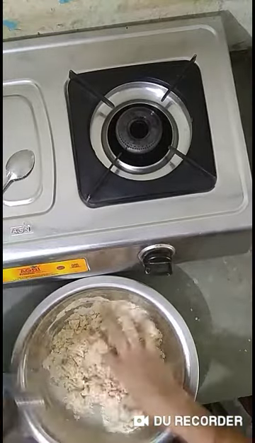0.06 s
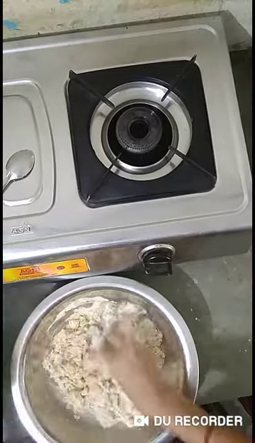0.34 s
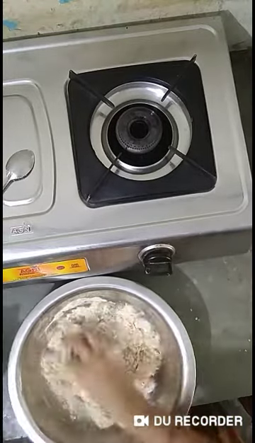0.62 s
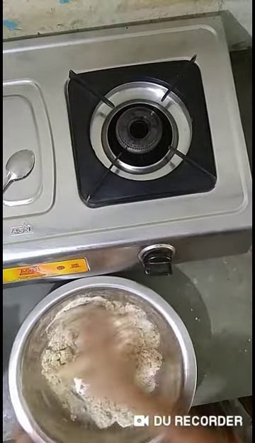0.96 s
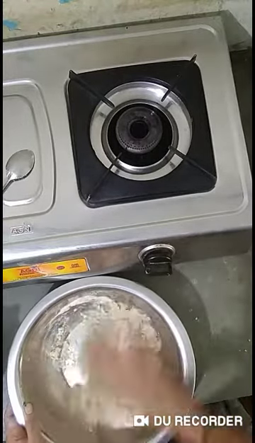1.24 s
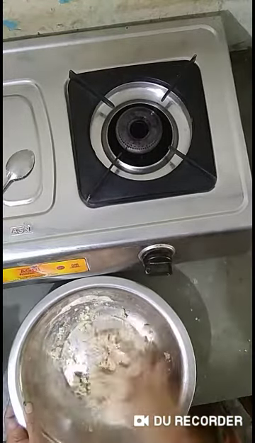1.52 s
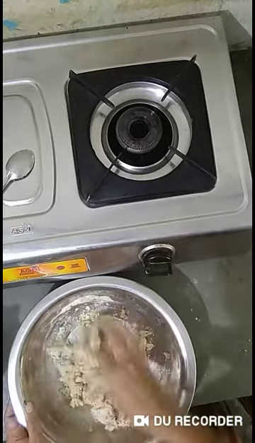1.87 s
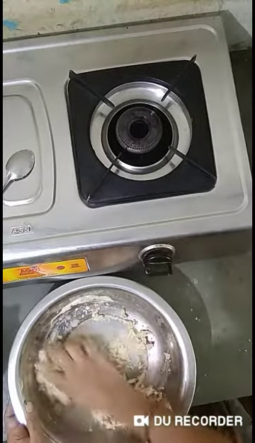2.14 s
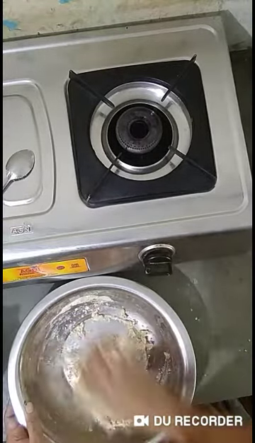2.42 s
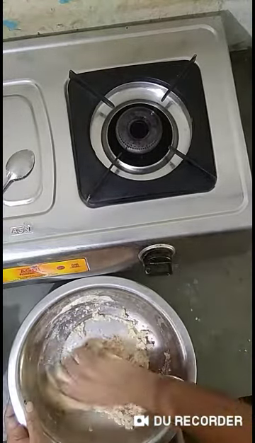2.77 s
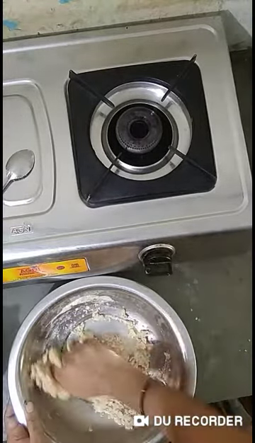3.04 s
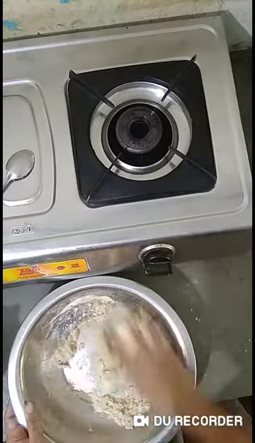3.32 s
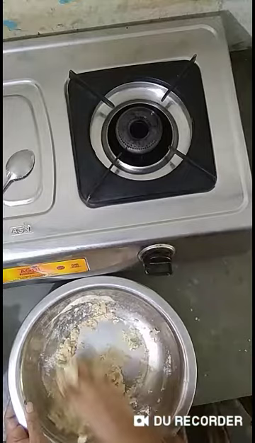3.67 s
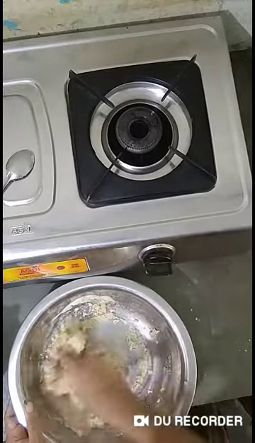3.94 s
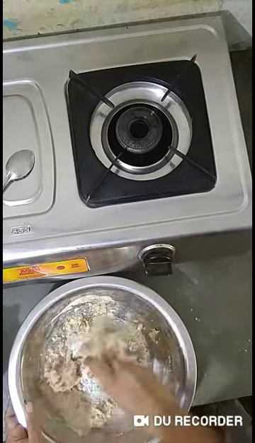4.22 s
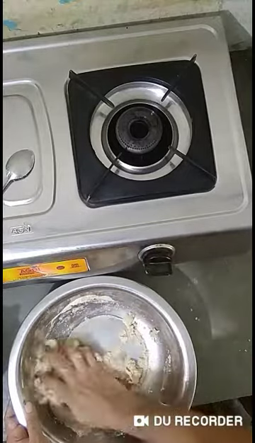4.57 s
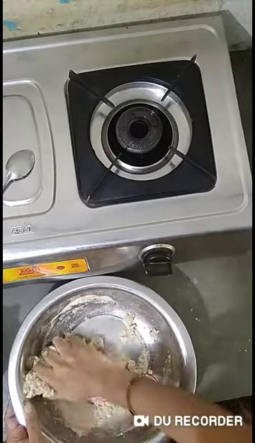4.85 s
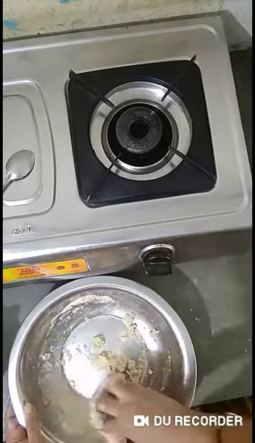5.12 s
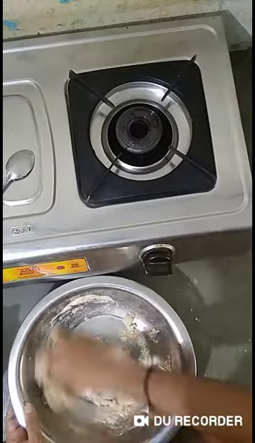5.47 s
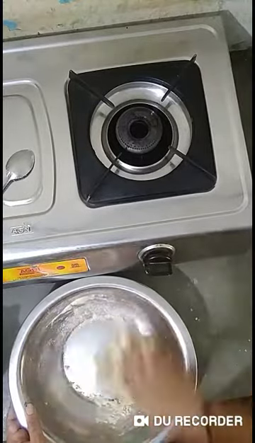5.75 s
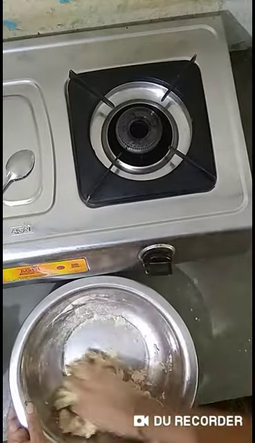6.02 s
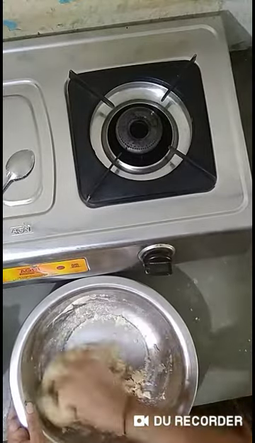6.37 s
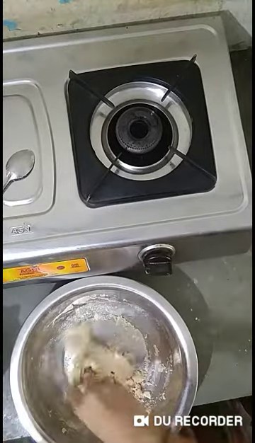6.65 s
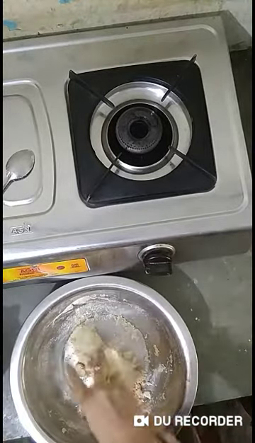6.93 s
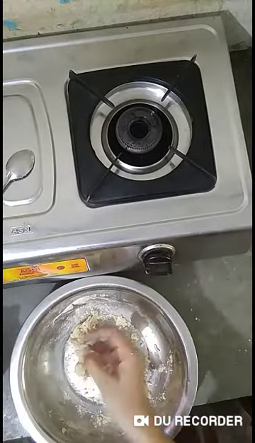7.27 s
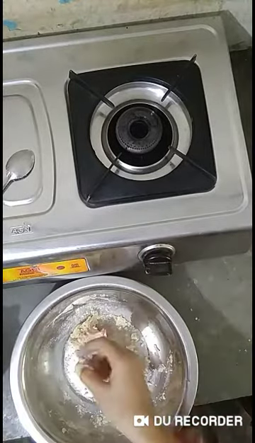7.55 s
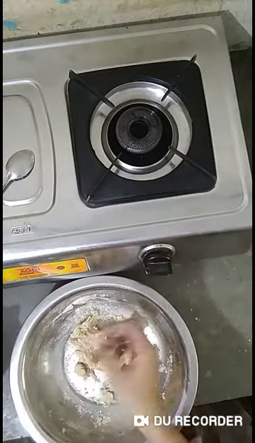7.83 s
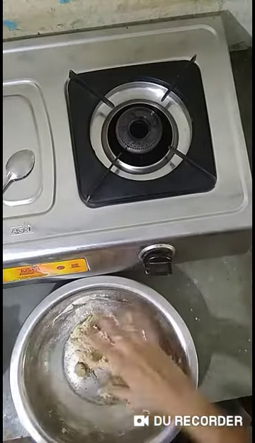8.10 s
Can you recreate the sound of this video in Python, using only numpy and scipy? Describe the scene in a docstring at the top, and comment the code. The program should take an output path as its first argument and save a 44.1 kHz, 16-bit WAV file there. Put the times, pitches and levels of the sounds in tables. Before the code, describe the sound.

Dry rubbing strokes of dough mixed by hand, with irregular thuds and brief rings of a steel bowl rocking on a kitchen counter.

```python
"""Dough in a steel bowl

Close to a stone counter in a small, hard kitchen; a stereo pair, the left microphone nearer the bowl.
A hand stirs and presses crumbly dough, and flour hisses along the steel with every stroke. A steel cup
is set down early on, then the bowl rocks, thuds and clanks on the stone and the room rings briefly.
Birds call faintly, far outside."""
import sys
import numpy as np
from scipy import signal
from scipy.fft import rfft, irfft, next_fast_len
from scipy.io import wavfile
from scipy.ndimage import uniform_filter1d

SR = 44100
rng = np.random.default_rng(int(sys.argv[2]) if len(sys.argv) > 2 else 0)


def dump_mix(stems):
    """Bounce the given channels to the path in sys.argv[1] as a 16-bit WAV at rate SR."""
    frames = np.atleast_2d(stems).T  # one column per channel
    limited = np.clip(frames, -1, 1)  # hard clip at full scale
    pcm = np.round(limited * 32767).astype(np.int16)
    wavfile.write(sys.argv[1], SR, pcm)


N = 369849

# The quiet kitchen. Each row: frequency in Hz, relative level in dB.
ROOM_TONE_SPECTRUM = [(20, -2), (45, -18), (67, 7), (90, -4.5), (240, -13), (430, -27.5), (750, -5),
                      (1100, -22.5), (1600, -36), (5000, -35), (16000, -36.5)]
# The hand's strokes. Each row: fastest moment, time speeding up and time slowing down in seconds,
# then relative level, pressure on the crumbs and grip on the bare wall in dB.
HAND_STROKES = [(0.13, 0.11, 0.2, -43, -3, 1), (0.23, 0.085, 0.081, -49, 8.5, 11),
                (0.56, 0.14, 0.13, -41.5, 5, -1.5), (0.78, 0.22, 0.42, -59, 3, 8),
                (1.09, 0.18, .22, -36.5, -4, -2.5), (1.52, 0.24, 0.16, -40.5, -1.5, -5),
                (2.1, 0.17, 0.19, -46.5, 0, -1), (2.36, 0.049, 0.042, -57, -10, -11),
                (2.61, 0.27, 0.17, -50, 3, 3.5), (2.87, 0.29, 0.23, -56.5, 3, 0),
                (3.17, 0.21, 0.3, -52.5, 4.5, 3), (3.435, 0.093, 0.09, -39, 1, -3.5),
                (3.7, 0.33, 0.15, -52.5, 5, 4.5), (3.9, 0.11, 0.21, -56, 1.5, 6.5),
                (4.13, 0.35, 0.17, -59, 0.5, 8), (4.48, 0.11, 0.19, -44.5, 2.5, 4),
                (4.89, 0.073, 0.19, -52.5, -5, -0.5), (5.04, 0.072, 0.12, -49.5, -5.5, -7),
                (5.36, .12, 0.18, -45, -1.5, -3.5), (5.58, 0.15, 0.059, -45.5, -3.5, -19),
                (5.85, 0.75, 0.49, -49.5, 2.5, 3), (6.45, .19, 0.3, -51.5, -1, 3),
                (6.8, 0.048, 0.12, -71, 12.5, 21.5), (7.009, .05, 0.092, -65.5, -4, 5.5),
                (7.245, 0.39, 0.081, -57, -26, -24.5), (7.365, 0.044, 0.096, -61, -12, -8),
                (7.645, 0.089, 0.12, -64.5, -20, -19.5), (7.914, 0.058, 0.11, -63, -26, 0),
                (8.108, .04, 0.088, -74, -1, 6.5), (8.215, 0.043, 0.38, -50.5, 0.5, 6.5)]
# Flour, then crumbs, sliding on steel. Each row: frequency in Hz, relative level in dB.
FLOUR_SPECTRUM = [(1500, -42), (3200, -25), (3900, -11.5), (5600, -7), (6600, -4), (8200, -4), (10400, 1),
                  (12500, -5), (15500, -9.5), (17000, -19.5)]
CRUMB_SPECTRUM = [(400, -28.5), (900, -22.5), (1200, -3.5), (1900, -6), (2500, -2), (3200, -1.5),
                  (3800, -1), (5000, -14)]
# The bowl's wall under the hand. Each row: resonance in Hz, width in Hz, relative level in dB.
WALL_RESONANCES = [(225, 19, -3.5), (293.4, 28, 5), (437.2, 100, 1.5), (613, 70, -1.5), (763, 40, 3),
                   (865, 18, 9), (1000, 150, -11.5), (1122, 40, 0.5)]
# Light ticks of steel, from a nail, a bangle or the landing bowl. Each row: start in seconds,
# the tick's lowest frequency in Hz, relative levels of clang and tick in dB.
STEEL_TOUCHES = [(0.043, 5530, -90, -51), (1.73, 5850, -61.5, -57.5), (1.816, 8800, -93, -49),
                 (2, 5670, -68, -49), (3.093, 6000, -63, -51.5), (3.224, 3450, -59, -53),
                 (4.333, 3460, -83, -75), (4.662, 4030, -48.5, -62), (6.278, 3966, -73, -74),
                 (6.752, 7000, -76, -61), (6.97, 6070, -76, -75), (7.346, 6400, -90, -69),
                 (8.092, 6000, -81, -83)]
# How a blow dies away in five bands: thump, boom, body, clang, tick. Each row: low and high edge in Hz,
# clatter t60 in seconds, room tail level in dB, room t60 in seconds, modes over clatter in dB.
BLOW_BANDS = [(35, 160, .2, 0.5, 0.81, 2), (160, 350, .11, -9, 0.71, 9.5), (378, 950, .1, -6, 0.44, 5),
              (1010, 3600, .13, 10, .33, -5), (3660, 17500, .11, 2, .31, -9)]
# The cup lands, then settles. Each row: start in seconds, relative levels of the five bands in dB.
CUP_LANDINGS = [(0.437, -37.5, -39, -20.5, -37, -32.5), (0.523, -46.5, -41.5, -27.5, -39, -48.5)]
# The ring of the cup and bowl, with the counter's low hum. Each row: frequency in Hz,
# relative level in dB, t60 in seconds.
CUP_MODES = [(107, 0, .6), (134, -2, .5), (208, 0, .4), (410, -14, .35), (478, -3, .16), (530, -3, .18),
             (595, -1, .22), (621, 2.5, .32), (738, -15, .33), (958, -10, .14), (1167, -2, .26),
             (1555, -9, .33), (1792, 1, .4), (1835, -8, .3), (2272, -4, .4), (2713, -2, .36),
             (3182, -8, .38), (4021, -5, .22), (4330, -6, .19), (5518, 1, .21), (5590, -3, .16),
             (7200, -4, .17), (8970, 0, .13), (10900, -3, .12)]
BOWL_AND_COUNTER_MODES = [(65.5, -1.5, 1), (226.5, 2, 0.59), (242, 3.5, 0.26), (300.3, 4, 0.33),
                          (382, -22.5, 0.41), (420.5, -0.5, 0.43), (464.7, 5, 0.14), (535, 3.5, 0.25),
                          (626, 3.5, 0.31), (745, 3.5, 0.27), (875, 5.5, 0.23), (1020, 0, 0.28),
                          (1156, -4, 0.081), (1129, -9.5, 0.49), (1207, -4.5, 0.076), (1390, -9.5, 0.16),
                          (1720, -6.5, 0.22), (1980, -10.5, 0.32), (2330, -8, 0.2), (3590, -16, 0.5),
                          (4460, -9.5, 0.19), (4470, -9, 0.31), (5070, -13, 0.18), (5324, -9.5, 0.14),
                          (5800, -9.5, 0.067), (6977, -34, .16), (8650, 0, 0.27), (9200, -6, 0.48),
                          (9500, -1, 0.24), (11510, -3, 0.21)]
# Cup and bowl clatter on the stone. Each row: frequency in Hz, relative level in dB.
CUP_CLATTER = [(50, -3.5), (300, -2), (560, 9.5), (800, -10), (1150, -5), (2000, -19), (3200, -21),
               (6000, -12), (10000, -7), (15500, -12)]
BOWL_CLATTER = [(50, 2.5), (140, -4), (220, -3), (420, 4.5), (600, 2), (950, -2.5), (1400, -4),
                (2200, -11.5), (3000, -19.5), (4500, -10.5), (7000, -6.5), (10000, -5.5), (15500, -13)]
# The bowl rocks onto the counter. Each row: start in seconds, strength in dB, hardness (treble over
# strength) in dB, flatness from 0 (on its edge) to 1 (whole base), favoured wall mode in Hz.
BOWL_LANDINGS = [(0.739, -47.5, -12.5, 0, 414), (0.914, -50.5, -13, 0.28, 422),
                 (0.963, -40, -4.5, 0.41, 400), (1.217, -27, -6.5, 0.25, 630),
                 (1.672, -52.5, -8.5, 0.82, 406), (2.001, -40.5, -10.5, 0.96, 440),
                 (2.092, -43.5, 4, 0.4, 624), (2.296, -52, -26.5, 0.4, 885), (2.471, -38, -27, 0.32, 425),
                 (2.566, -49.5, -9, 0.81, 422), (2.616, -30, -15, 0.55, 435),
                 (3.035, -55.5, -36, 0.65, 879), (3.62, -35.5, -9, 0.81, 404),
                 (4.198, -56.5, -8.5, 0.77, 730), (4.357, -46, -2.5, 0, 785), (4.486, -36, -6, 0.4, 460),
                 (4.516, -31, 1.5, 0, 430), (4.594, -40, -4.5, 0.62, 879), (4.665, -41.5, -7.5, 0.47, 475),
                 (4.9, -37, -29, 0.48, 474), (5.523, -43.5, -10, 0.37, 427), (5.875, -40, -9, 0.26, 930),
                 (5.971, -31.5, -2, 0.39, 360), (6.381, -45.5, -29, 0.33, 444),
                 (6.472, -42, -15.5, 0.39, 466), (6.769, -50, -7.5, 0.4, 880), (7.929, -60.5, -36, 1, 622),
                 (8.214, -33.5, -10.5, 0.64, 427)]
# The bowl's bare edge lands hard. Each row: start in seconds, pitch in Hz, relative level in dB.
EDGE_CLINKS = [(0.962, 6600, -44), (1.214, 1910, -51), (2.091, 5450, -41.5), (4.514, 2086, -41),
               (4.518, 4273, -34.5), (4.516, 5360, -36), (4.515, 8380, -35.5), (5.971, 4450, -33.5),
               (5.971, 5050, -45.5), (5.969, 5340, -46.5)]
# Birds outside. Each row: start and length in seconds, first, middle and last pitch in Hz,
# relative level in dB.
FAR_CALLS = [(2.842, 0.26, 1610, 1802, 1740, -56.5), (4.739, 0.26, 2150, 1920, 1865, -62.5),
             (7.194, 0.188, 773, 739, 744, -58), (7.26, 0.21, 1534, 1472, 1485, -65.5),
             (7.496, 0.094, 3600, 3520, 3780, -74.5), (7.93, 0.13, 3510, 3430, 3510, -75.5)]
# How alike the two microphones sound. Each row: frequency in Hz, correlation.
MIC_CORRELATION = [(60, .9), (150, .94), (280, .85), (580, .78), (900, .15), (1400, 0), (16000, 0)]
# Their balance. Each row: frequency in Hz, left over right in dB.
MIC_BALANCE = [(60, .5), (125, 1.7), (250, 3.2), (2000, 3.8), (8000, 2.8), (12500, -1)]

LEAD_S = .008  # the counter carries the thud before the steel edge lands


def amp(db):
    return 10 ** (np.asarray(db) / 20)


def unit_rms(x):
    return x / np.sqrt(np.mean(x ** 2) + 1e-20)


def curve_at(points, hz):
    """Read a table along a log-frequency axis."""
    f, value = np.transpose(points)
    return np.interp(np.log(hz + 1), np.log(f + 1), value)


def add(mix, start_s, sound):
    part = mix[:, max(round(start_s * SR), 0):][:, :sound.shape[1]]
    part += sound[:, :part.shape[1]]


def decay(t, t60):
    """Amplitude that falls 60 dB in t60 seconds."""
    return np.exp(-np.log(1000) * t / t60)


def band(x, low_hz, high_hz):
    return signal.sosfilt(signal.butter(4, [low_hz, high_hz], "band", fs=SR, output="sos"), x)


def mic_pair(x, spectrum=None):
    """Two unrelated signals become a microphone pair, alike in the bass, with an optional colour."""
    size = next_fast_len(x.shape[1])
    bins, hz = rfft(x, size), np.fft.rfftfreq(size, 1 / SR)
    alike = curve_at(MIC_CORRELATION, hz)
    bins[1] = alike * bins[0] + np.sqrt(1 - alike ** 2) * bins[1]
    colour = amp(curve_at(spectrum, hz)) if spectrum else 1
    return irfft(bins * colour, size)[:, :x.shape[1]]


def room_tone():
    """The kitchen's steady low hush at both microphones."""
    return amp(-79.5) * unit_rms(mic_pair(rng.standard_normal((2, N)), ROOM_TONE_SPECTRUM))


def stroke_levels():
    """Hiss, scrape and drone over time, in dB: all three swell and fade with each stroke."""
    t, power = np.arange(0, N, 64) / SR, 1e-11
    scrape_db, drone_db, end_drop_db = -6.5, -5, 16.5
    for peak_s, rise_s, fall_s, level_db, pressure_db, grip_db in HAND_STROKES:
        from_peak = np.maximum((peak_s - t) / rise_s, (t - peak_s) / fall_s)
        drop_db = end_drop_db * from_peak ** 1.5  # the exponent rounds the top of the stroke
        layers_db = np.array([0, scrape_db + pressure_db, drone_db + grip_db])[:, None]
        power = power + amp(level_db + layers_db - drop_db) ** 2
    return [np.interp(np.arange(N) / SR, t, 10 * np.log10(layer)) for layer in power]


def rippled(x, ripple_db, step_hz=330):
    """Peaks and dips across the spectrum, set by the spot where the steel is touched."""
    size = next_fast_len(x.shape[1])
    heights = np.interp(np.fft.rfftfreq(size, 1 / SR), step_hz * np.arange(128), rng.standard_normal(128))
    return irfft(rfft(x, size) * amp(ripple_db * heights), size)[:, :x.shape[1]]


def sliding_grains(spectrum, slips_per_s, spread_db, smooth_db, ripple_db):
    """Tiny uneven slips over a smooth sliding noise; each patch of wall scatters them differently."""
    slips = (rng.random(N) < slips_per_s / SR) * rng.choice([-1, 1], N)
    slips = slips * amp(spread_db * np.minimum(rng.exponential(1, N), 4))
    size, hop = 6144, 3072
    friction = np.pad(unit_rms(slips) + amp(smooth_db) * rng.standard_normal(N), (hop, size))
    t, out = np.arange(size) / SR, np.zeros((2, len(friction)))
    passing = np.sin(np.pi * np.arange(size) / size)
    fall = decay(t, 0.028) + amp(-16.5) * decay(t, 0.076)
    for start in range(0, N + hop, hop):
        scatter = unit_rms(rippled(rng.standard_normal((2, size)), ripple_db) * fall)
        patch = friction[start:start + size] * passing
        add(out, start / SR, signal.fftconvolve(patch[None], scatter, axes=1))
    return unit_rms(mic_pair(out[:, hop:hop + N], spectrum))


def rubbing():
    """The hand drags flour round the wall: hiss, a coarser scrape, and the wall's own drone."""
    hiss_db, scrape_db, drone_db = stroke_levels()
    # the fingers catch and slip
    catch = unit_rms(uniform_filter1d(uniform_filter1d(rng.standard_normal(N), 700), 500))
    flour = sliding_grains(FLOUR_SPECTRUM, slips_per_s=3500, spread_db=1.5, smooth_db=-2.5, ripple_db=2.5)
    crumbs = sliding_grains(CRUMB_SPECTRUM, slips_per_s=920, spread_db=0.5, smooth_db=0, ripple_db=0.34)
    hiss = flour * amp(hiss_db + .7 * catch)
    scrape = crumbs * amp(scrape_db + .6 * catch)
    drag = mic_pair(rng.standard_normal((2, N)))
    wall = sum(amp(db) * signal.lfilter(*signal.iirpeak(hz, hz / width, SR), drag)
               for hz, width, db in WALL_RESONANCES)
    drone = unit_rms(band(wall, 150, 1250)) * amp(drone_db + 1.6 * catch)
    # the arm's weight shakes the counter's lowest mode, which grows less than the drone
    sway = unit_rms(band(drag, 61, 73)) + amp(-15) * unit_rms(band(drag, 22, 180))
    rumble = unit_rms(sway) * amp(drone_db - 0.52 * np.maximum(drone_db + 67, 0))
    return amp(-1.41) * hiss + scrape + amp(-2) * drone + amp(-8) * rumble


def steel_ticks():
    """Light touches of a nail, a bangle or the landing bowl: a snap and a short spray of reflections."""
    t, out = np.arange(SR // 4) / SR, np.zeros((2, N))
    for start_s, lowest_hz, clang_db, tick_db in STEEL_TOUCHES:
        snap = rng.standard_normal((2, len(t))) * (decay(t, 0.019) + amp(-8.5) * decay(t, 0.4))
        for level_db, low_hz, high_hz in [(clang_db, 1000, 4000), (tick_db, lowest_hz, 15000)]:
            part = band(snap, low_hz, high_hz)
            add(out, start_s, amp(level_db) * part / part[:, :SR // 32].std())
    return out


def ring(modes, t, spread_db):
    """The struck spot sets each mode's strength, and each microphone hears its own phase."""
    hz, db, t60 = np.transpose(modes)[:, :, None]
    strength, phase, side = rng.standard_normal((3, len(modes), 1))
    waves = amp(db + spread_db * strength) * decay(t, t60) * np.exp(2j * np.pi * (hz * t + phase))
    mic_phase = np.arccos(curve_at(MIC_CORRELATION, hz)) * np.sign(side)
    return np.array([waves.sum(0).real, (waves * np.exp(1j * mic_phase)).sum(0).real])


def steel_on_stone(levels_db, modes, clatter_spectrum, spread_db, lead_db, steel_db):
    """A soft push through the counter, then a crack, modes, dense clatter and the room's tail."""
    t = np.arange(SR * 3 // 4) / SR
    before_landing = np.arange(len(t)) < round(LEAD_S * SR)
    since_landing = np.maximum(t - LEAD_S, 0)
    # the modes start slightly louder and ease off as they ring
    tones = ring(modes, t, spread_db) * (1 + amp(-9.5) * decay(since_landing, 0.59))
    noise = mic_pair(rng.standard_normal((2, len(t))), clatter_spectrum)
    crack = amp(-12.5) * decay(since_landing, 0.0061)
    out = np.zeros_like(tones)
    for level_db, (low_hz, high_hz, clatter_t60, tail_db, room_t60, modes_db) in zip(levels_db, BLOW_BANDS):
        contact = np.where(before_landing, amp(lead_db) * (low_hz < 700), 1)
        fall = crack + decay(since_landing, clatter_t60) + amp(tail_db) * decay(since_landing, room_t60)
        clatter = unit_rms(band(noise * fall * contact, low_hz, high_hz))
        ringing = unit_rms(band(tones * contact, low_hz, high_hz))
        part = clatter + amp(modes_db + steel_db * (low_hz > 700)) * ringing
        out += amp(level_db) * part / part[:, :SR // 16].std()
    return out


def cup_set_down():
    """The cup lands on one edge and settles; its bare steel rings clearly in the treble."""
    out = np.zeros((2, N))
    for start_s, *levels_db in CUP_LANDINGS:
        blow = steel_on_stone(levels_db, CUP_MODES, CUP_CLATTER, spread_db=1, lead_db=-12, steel_db=8)
        add(out, start_s - LEAD_S, blow)
    return out


def knock_levels(strength_db, hardness_db, flatness):
    """A knock's five band levels: flat landings thump, hard ones clang and tick, cushioned ones boom."""
    thump_db = -34.5 + 0.58 * strength_db + 10 * flatness
    cushioned_db = -15.5  # below this hardness the dough muffles the bowl's body too
    body_db = strength_db + 0.92 * min(hardness_db - cushioned_db, 0)
    return thump_db, strength_db, body_db, strength_db + hardness_db, strength_db + 1.22 * hardness_db


def bowl_knocks():
    """The pushed bowl tips and drops back; the way it lands favours a low mode and a wall mode."""
    edge_hz, base_hz, favour_db = 301, 228, 10
    out = np.zeros((2, N))
    for start_s, strength_db, hardness_db, flatness, wall_hz in BOWL_LANDINGS:
        favoured = [(edge_hz, 1 - flatness), (base_hz, flatness), (wall_hz, 1)]
        modes = []
        for hz, db, t60 in BOWL_AND_COUNTER_MODES:
            nearness = max(share * np.exp(-(np.log(hz / f) / .13) ** 2) for f, share in favoured)
            modes.append((hz, db + favour_db * nearness, t60))
        levels_db = knock_levels(strength_db, hardness_db, flatness)
        blow = steel_on_stone(levels_db, modes, BOWL_CLATTER, spread_db=3, lead_db=-3.5, steel_db=-0.5)
        add(out, start_s - LEAD_S, blow)
    return amp(-3.5) * out


def edge_clinks():
    """The bowl's bare edge lands hard; close high modes beat against each other as they die."""
    t, out = np.arange(SR // 2) / SR, np.zeros((2, N))
    for start_s, hz, level_db in EDGE_CLINKS:
        t60 = 0.25 * (hz / 5000) ** -.2  # higher clusters die sooner
        neighbours = [(hz + offset_hz, -5, t60) for offset_hz in 190 * rng.standard_normal(14)]
        clink = ring([(hz, 0, t60)] + neighbours, t, spread_db=2.5)
        add(out, start_s, amp(level_db) * clink / clink[:, :SR // 16].std())
    return amp(-1.3) * out


def distant(x, t60, wet_db):
    """Direct sound plus a short diffuse tail at each microphone."""
    t = np.arange(SR // 2) / SR
    tail = mic_pair(rng.standard_normal((2, len(t)))) * decay(t, t60) * (t > .002)
    return x + amp(wet_db) * signal.fftconvolve(x, tail / np.linalg.norm(tail[0]), axes=1)[:, :N]


def far_birds():
    """Thin hoarse calls that glide through three pitches, blurred by distance."""
    rise_s, fade_db = 0.023, -7.5
    out = np.zeros((2, N))
    for start_s, length_s, *pitches_hz, level_db in FAR_CALLS:
        t = np.arange(0, length_s, 1 / SR)
        waver = 1 + .032 * unit_rms(uniform_filter1d(rng.standard_normal(SR), 120))[:len(t)]
        hz = np.interp(t / length_s, [0, .5, 1], pitches_hz) * waver
        swell = np.minimum(t / rise_s, 1) * amp(level_db + fade_db * t / length_s)
        call = swell * signal.windows.tukey(len(t), .15) * np.sin(2 * np.pi * np.cumsum(hz) / SR)
        add(out, start_s, call[None])
    return amp(-5) * distant(out, t60=.25, wet_db=4)


def scene():
    """The work at the counter up close, the kitchen and the birds behind it."""
    return (room_tone() + rubbing() + steel_ticks() + cup_set_down() + bowl_knocks() + edge_clinks()
            + far_birds())


def record(dry):
    """The left microphone is nearer the bowl but shaded in the top treble; both are band-limited."""
    size, cutoff_hz = next_fast_len(N), 16150
    tilt_db = curve_at(MIC_BALANCE, np.fft.rfftfreq(size, 1 / SR)) / 2
    heard = irfft(rfft(dry, size) * amp([tilt_db, -tilt_db]), size)[:, :N]
    lowpass = signal.firwin(401, cutoff_hz, window=("kaiser", 9), fs=SR)
    return signal.oaconvolve(heard, lowpass[None], "same")


dry = scene()
out = record(dry)
dump_mix(out)
```